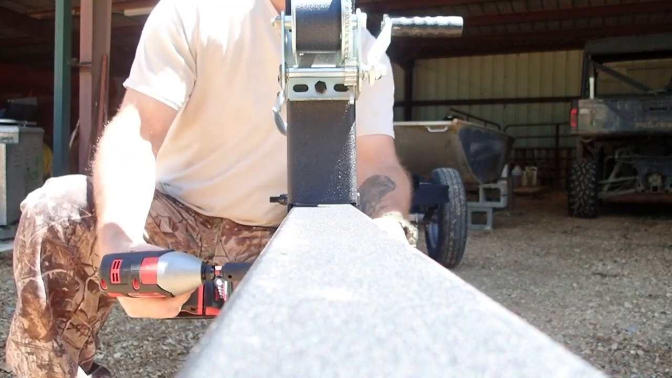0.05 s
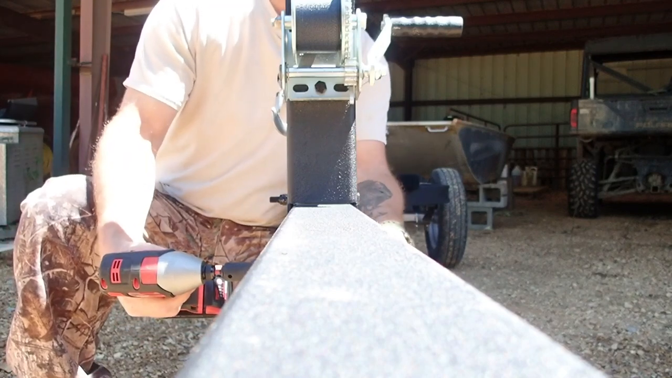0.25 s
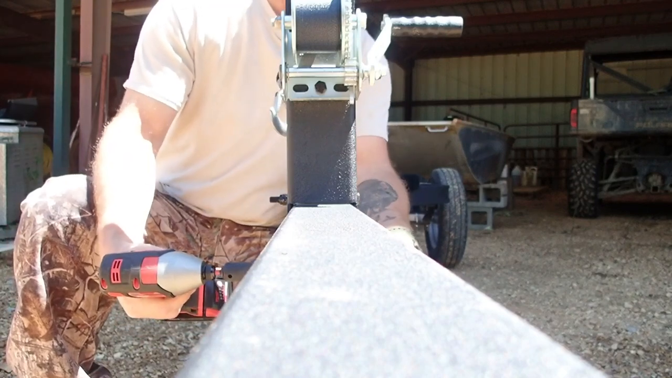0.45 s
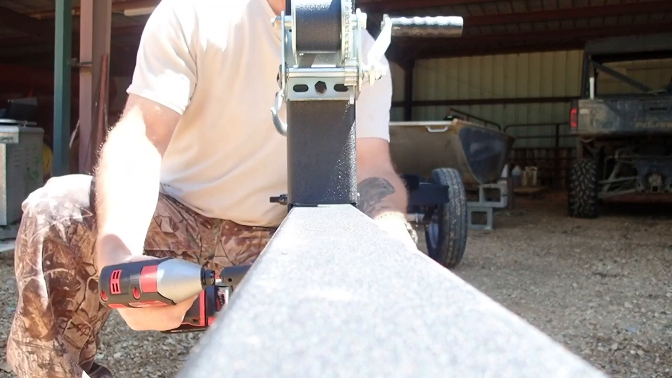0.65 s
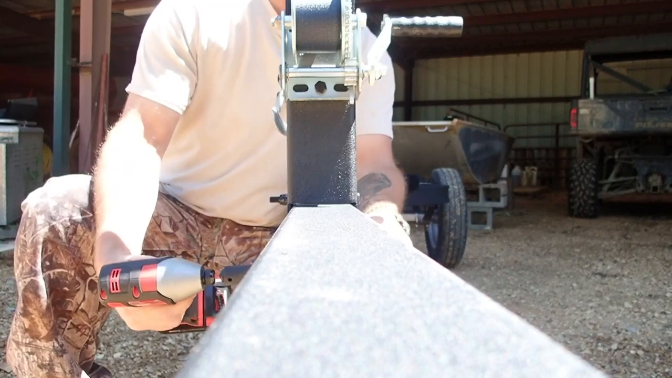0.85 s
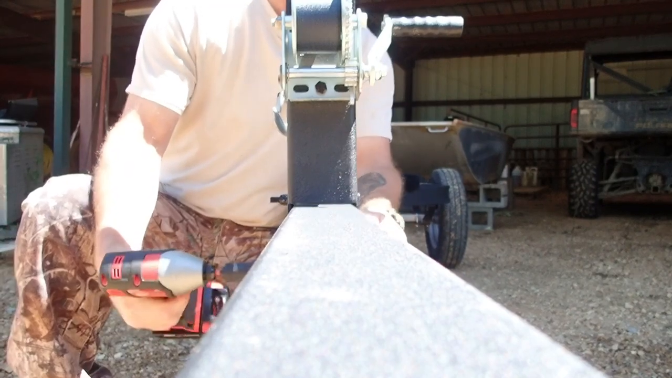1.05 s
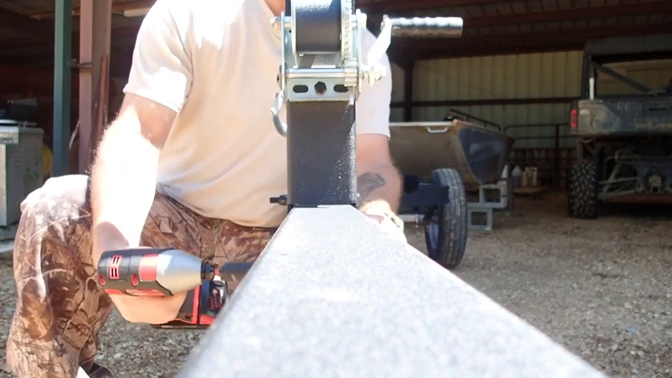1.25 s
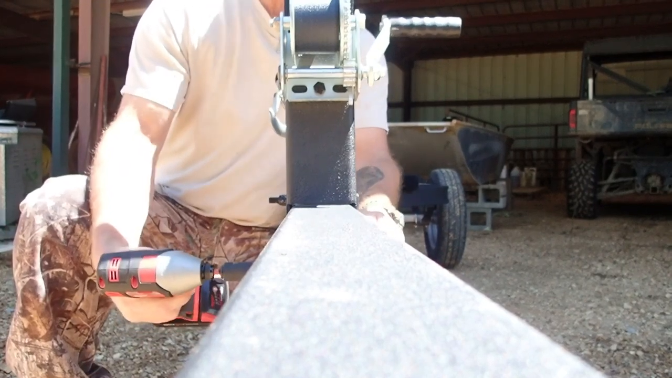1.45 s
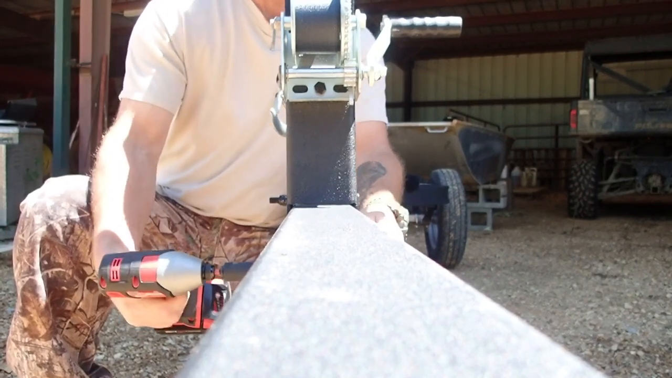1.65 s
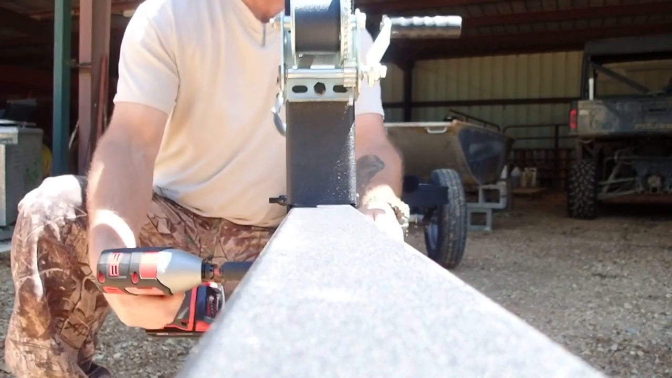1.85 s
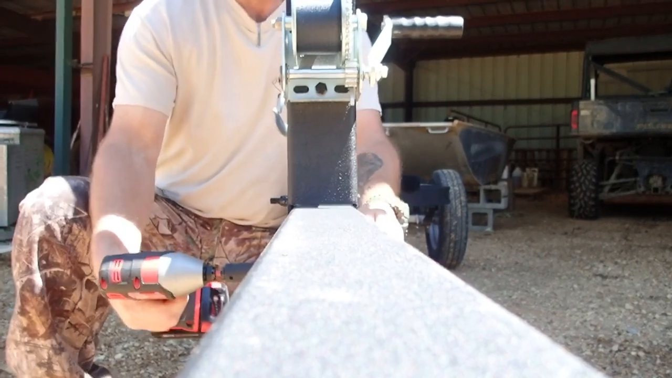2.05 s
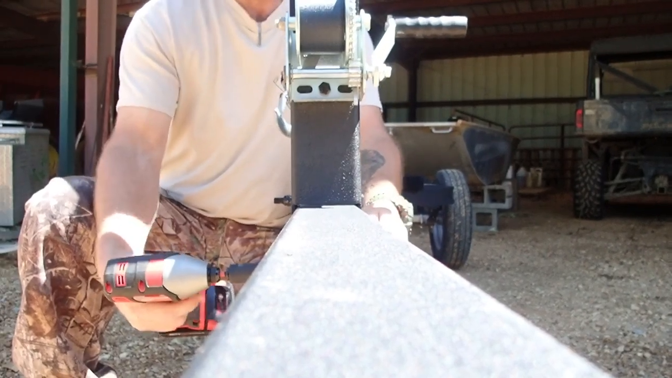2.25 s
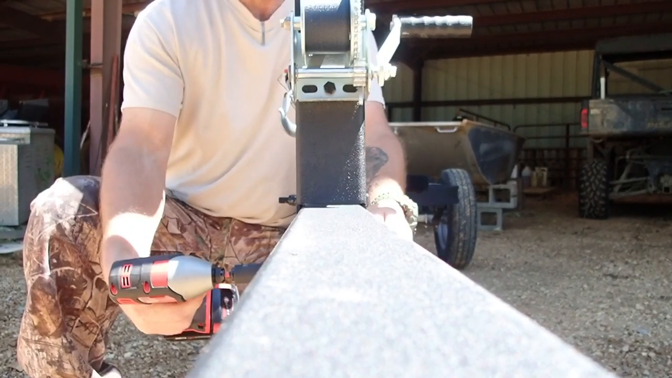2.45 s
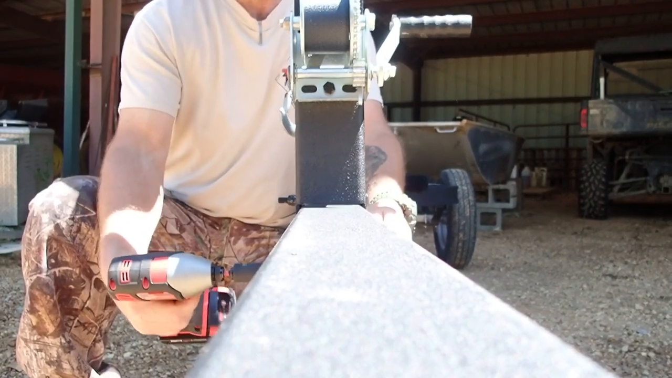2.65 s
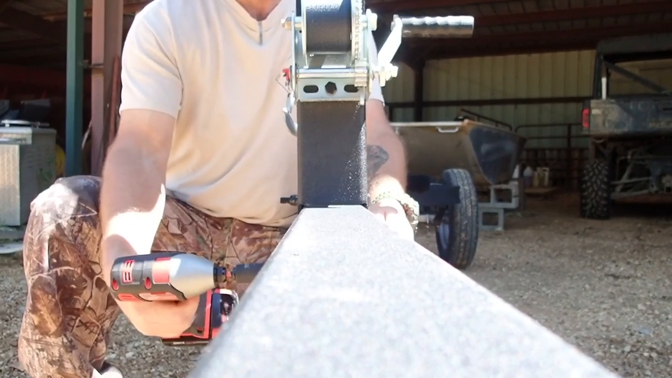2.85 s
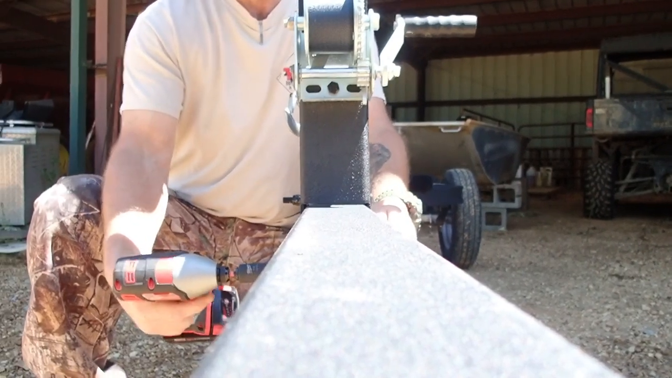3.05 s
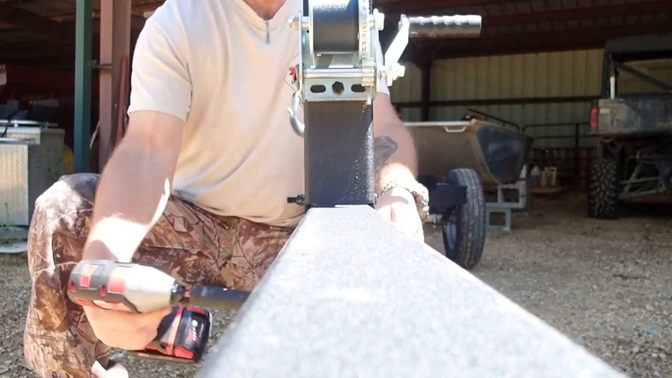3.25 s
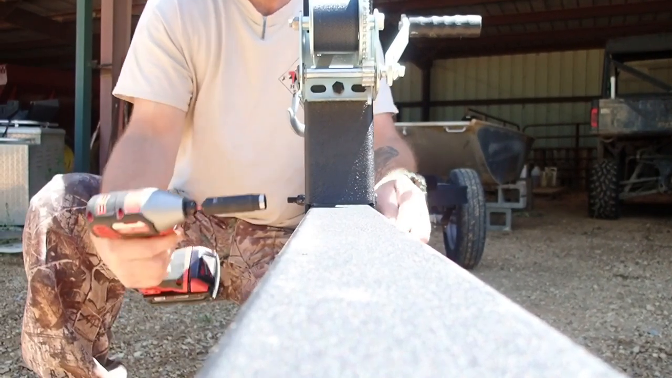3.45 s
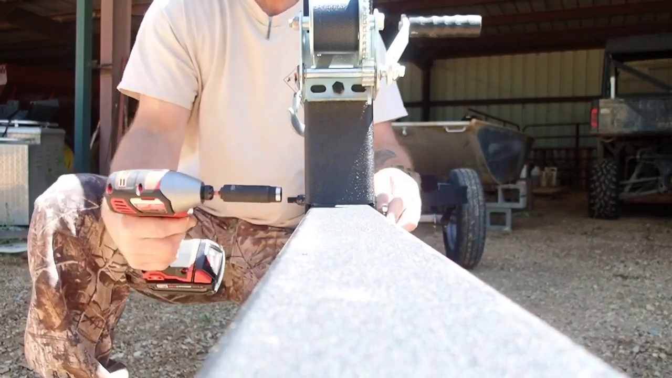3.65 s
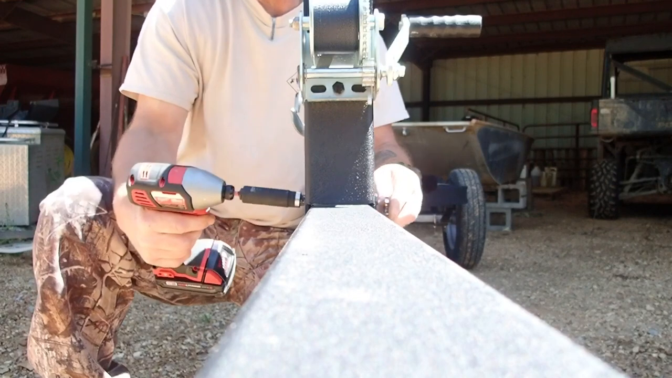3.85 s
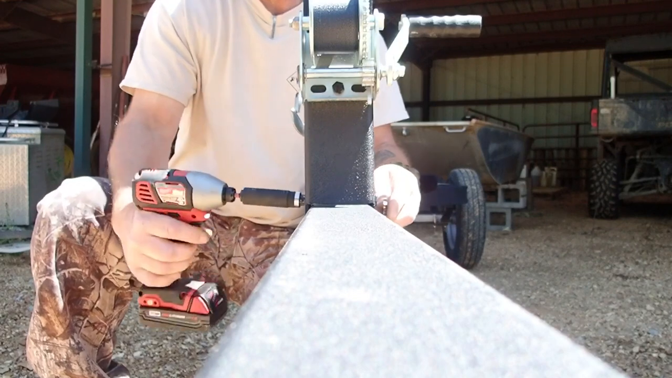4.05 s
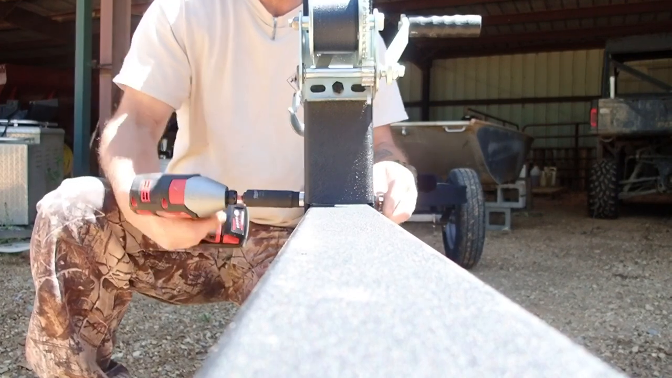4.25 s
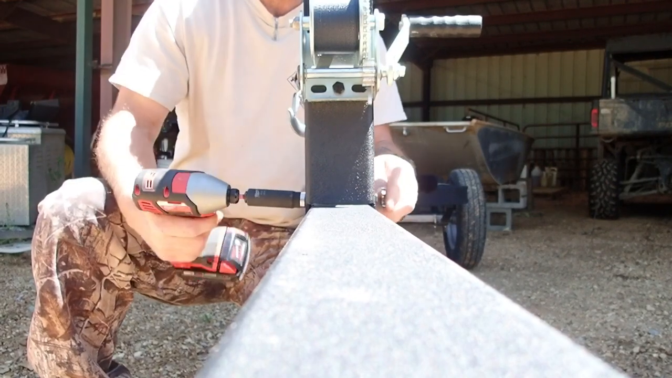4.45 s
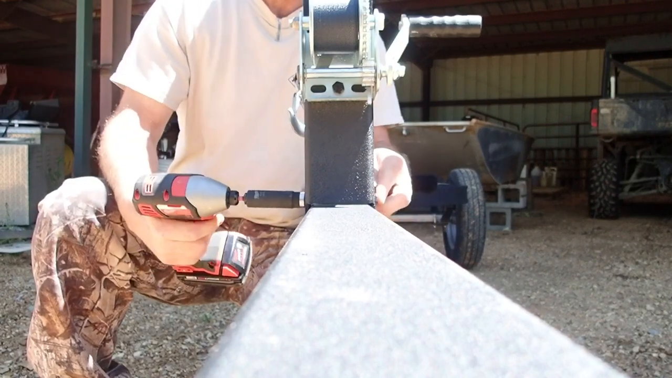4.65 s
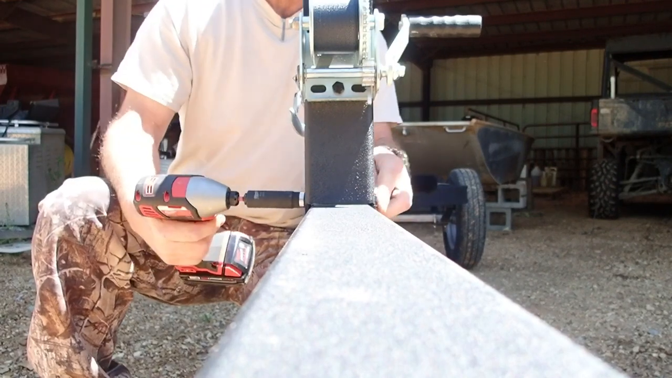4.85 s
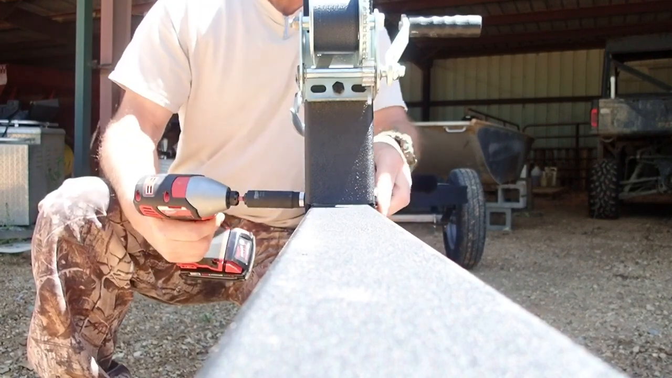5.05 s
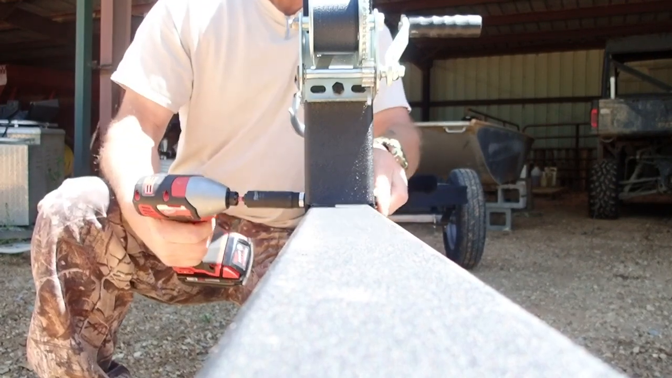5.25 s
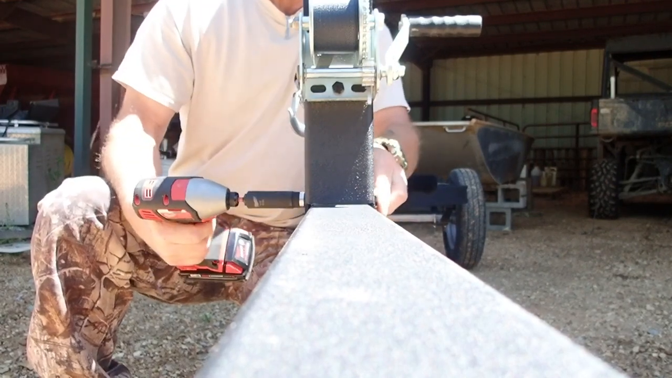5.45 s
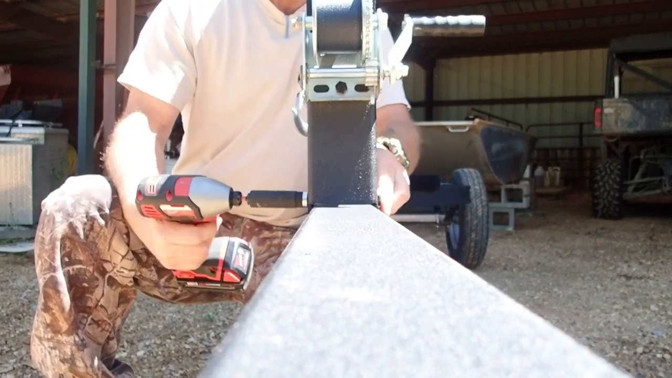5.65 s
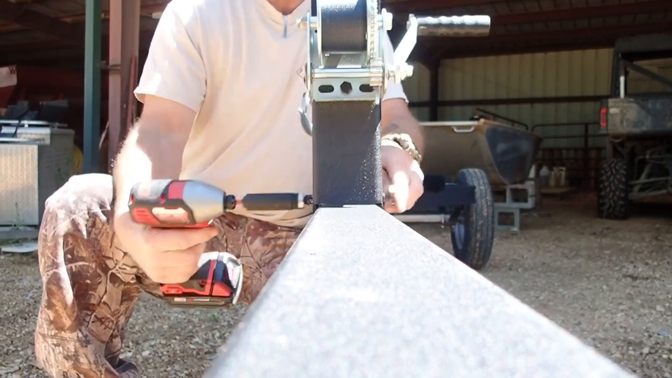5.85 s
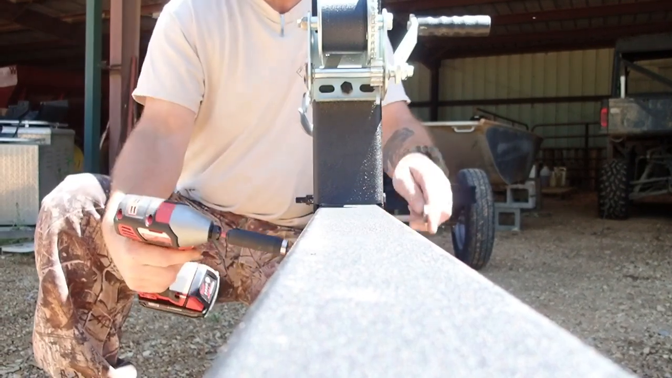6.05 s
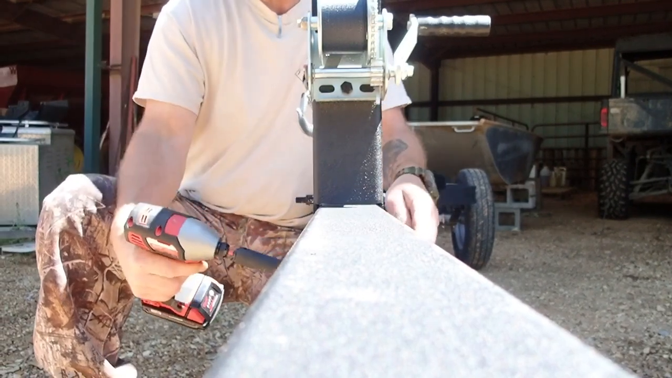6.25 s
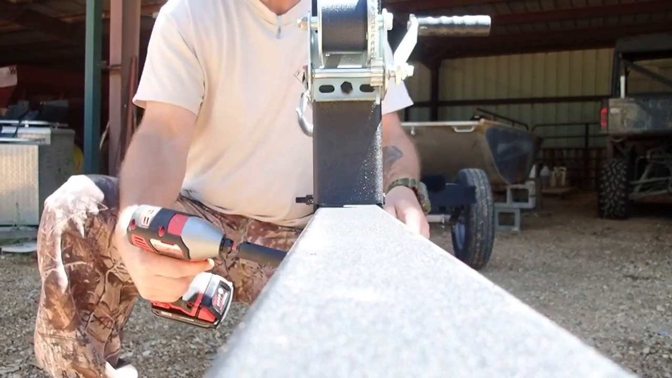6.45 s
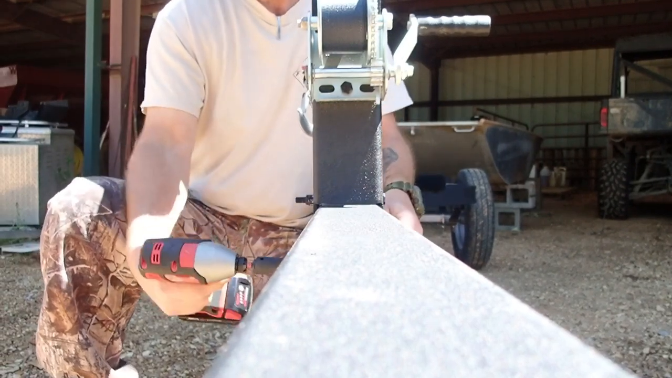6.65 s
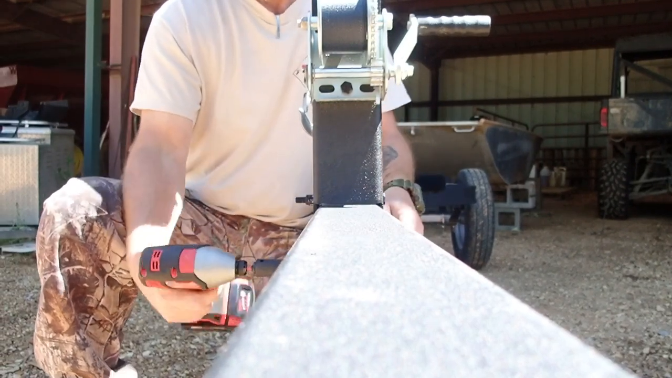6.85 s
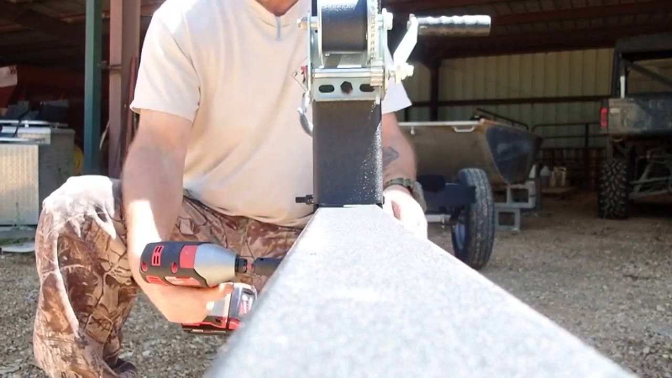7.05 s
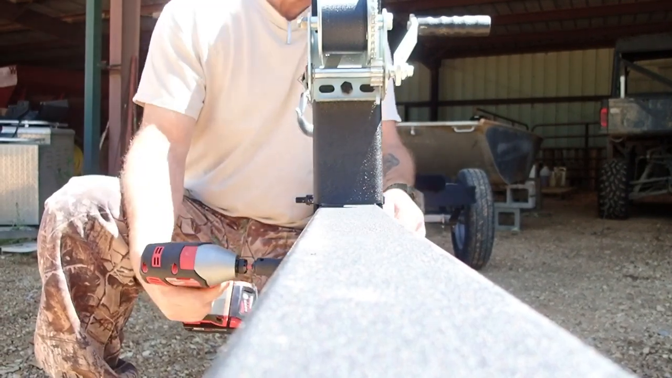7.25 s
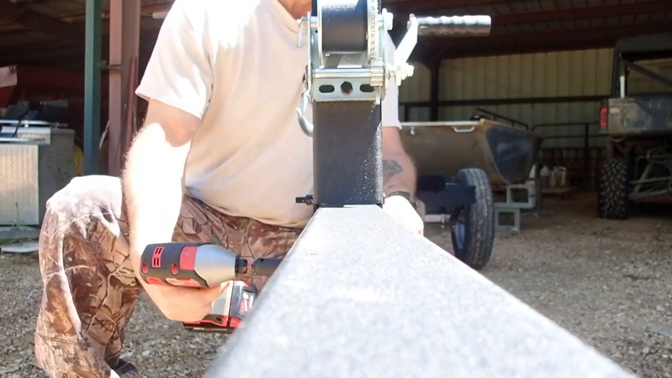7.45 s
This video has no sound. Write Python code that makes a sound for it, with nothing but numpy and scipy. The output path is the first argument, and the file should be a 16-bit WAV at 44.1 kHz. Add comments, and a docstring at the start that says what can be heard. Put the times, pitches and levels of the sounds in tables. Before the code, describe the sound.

A cordless impact driver hammers in short rapid bursts on a steel winch stand, with metallic socket knocks between, echoing softly in an open shed.

```python
"""First comes a faint rumble with hiss, then soft knocks of socket and spanner on a steel winch stand.
At the mouth of a shed, a cordless impact driver then tightens two bolts, with more knocks in between.
Blows, knocks and gear rattle are short bursts of noise, coloured by filters and by ringing steel.
A thin whine, a sine tone, leads each pull of the trigger. Fading noise makes the shed's low echo."""
import sys
import numpy as np
from scipy import signal
from scipy.fft import rfft, irfft, next_fast_len
from scipy.io import wavfile
from scipy.ndimage import uniform_filter1d

SR = 44100
rng = np.random.default_rng(int(sys.argv[2]) if len(sys.argv) > 2 else 0)


def log_audio(samples):
    """Write samples as a 16-bit WAV file to the path given in sys.argv[1]."""
    # one column per channel
    frames = np.atleast_2d(samples).T
    # limit to full scale, then quantise
    limited = np.clip(frames, -1, 1)
    pcm = np.round(limited * 32767).astype(np.int16)
    wavfile.write(sys.argv[1], SR, pcm)


N = 330731
TIME = np.arange(N) / SR

# the background's tone: [f/Hz, relative level/dB per Hz]
AIR_COLOUR = [(25, -33), (60, 3), (100, -11.5), (145, 3.5), (200, -35), (300, -6), (430, -16.5), (700, -17),
              (1000, -13.5), (1800, -22.5), (3000, -38.5), (4200, -30), (6500, -15.5), (7600, -20),
              (9200, -11), (10500, -25.5), (15500, -25.5)]
AIR_DB = -52.5  # rms, before the microphone

# socket or spanner knocks on the stand:
# [t/s, tube clang level/dB, socket clink level/dB, length/ms, strongest ring f/Hz]
KNOCKS = [(0.125, -40.5, -61, 17, 317), (0.668, -37.5, -64, 18.5, 322), (0.797, -20, -14.5, 8.2, 938),
          (1.063, -32, -31.5, 48, 970), (1.237, -25.5, -31, 32, 203), (1.422, -16, -12, 1.9, 1230),
          (3.277, -28.5, -25.5, 11, 1226), (3.809, -13.5, -15, 15.4, 1103), (3.874, -16.5, -12.5, 22, 1700),
          (3.893, -19.5, -25, 20.5, 1617), (3.922, -16.5, -9.5, 8.4, 943), (4.220, -36, -34, 17, 996),
          (4.268, -38, -41, 31, 967), (4.337, -29.5, -26.5, 5, 1700), (4.341, -16.5, -13.5, 21.7, 1763),
          (4.349, -14.5, -34, 18.4, 1697), (4.692, -26.5, -34, 2.3, 905), (4.971, -32.5, -29.5, 7.3, 984),
          (5.018, -21.5, -10, 5.1, 2040), (5.266, -28.5, -15.5, 16, 1060), (5.325, -24, -10, 1.1, 1110),
          (5.976, -21, -15.5, 13, 1660), (6.448, -24, -33, 28.5, 900), (6.592, -32.5, -29.5, 25, 960),
          (6.615, -20.5, -10.5, 11, 988), (6.627, -12.5, -6, 3.9, 932), (6.660, -17.5, -13.5, 12, 1330),
          (6.686, -22.5, -17, 28, 1600), (6.715, -26.5, -10, 7, 1550), (6.768, -17.5, -18.5, 25.3, 1500),
          (6.842, -31.5, -28.5, 14, 1640), (6.915, -35.5, -36, 18, 993), (7.080, -33, -55.5, 1.3, 1603)]
# hands shift on the steel with soft random taps:
# [start t/s, end t/s, clang level/dB, clink level/dB, strongest ring f/Hz]
FUMBLES = [(.35, .46, -51, -72, 315), (4.479, 4.54, -36.5, -33.5, 1387), (4.828, 4.95, -40.5, -52, 968),
           (6.97, 7.08, -47.5, -43, 311)]
TAPS_PER_S, TAP_SPREAD_DB, TAP_MS = 40, 3.5, 12.8
# the frame thuds more for a harder and a longer push
THUD_DB, THUD_SHARE, THUD_MS, THUD_SLOPE = -17.5, 0.77, 13.8, 1
# after a knock the frame rocks back with a softer, longer thud
SWAY_S, SWAY_DB, SWAY_MS = 0.045, -4.5, 27
KNOCK_RING_DB, KNOCK_RING_T60_S = -3.5, 0.049

# tone of a clanging tube: [f/Hz, relative level/dB per Hz]
CLANG_COLOUR = [(100, -62), (450, -29), (560, -15.5), (660, -12), (900, 2), (1200, -1.5), (1650, -1.5),
                (2050, -3), (2600, -18), (4000, -19), (9000, -37)]
# tone of a clinking socket: [f/Hz, relative level/dB per Hz]
CLINK_COLOUR = [(800, -14), (2500, -19), (3400, -11.5), (4800, 7.5), (6000, 4.5), (7000, 4), (7800, -7.5),
                (9000, -7), (10500, -24), (15500, -34.5)]
# tone of a thudding frame: [f/Hz, relative level/dB per Hz]
THUD_COLOUR = [(25, -11.5), (80, -24), (130, -2.5), (200, 2), (310, 1.5), (450, -5), (570, -4.5),
               (700, -11), (1500, -35), (5000, -63)]
# ringing modes of the steel tube: [f/Hz, relative level/dB, time to fade by 60 dB t/s]
TUBE_MODES = [(882, -2.5, 0.51), (964, 5.5, 0.13), (1107.3, -2, 0.26), (1290, -5, 0.69), (1361, 3.5, 0.75),
              (1503, -12, 0.09), (1652, 4, 0.12), (1706, -10.5, 0.31), (1705, -6.5, 0.24),
              (1968, -4.5, 0.13), (2134, -13, .08)]
# ringing modes of socket and anvil: [f/Hz, relative level/dB, time to fade by 60 dB t/s]
SOCKET_MODES = [(5100, -14.5, .05), (5630, -16.5, 0.084), (6118, -21, 0.093), (6447, 8, 0.22),
                (7100, -15.5, 0.14), (6880, 0.5, 0.045), (6430, 4, .05), (7130, -0.5, 0.037)]

# echo strength of nearby surfaces: [f/Hz, level/dB]
NEAR_LEVEL = [(150, -6.5), (1200, -2), (3000, -2.5), (6000, -7.5), (14000, -1.5)]
# echo length of nearby surfaces: [f/Hz, time to fade by 60 dB t/s]
NEAR_T60 = [(150, 0.15), (1200, 0.19), (6000, 0.18), (14000, 0.03)]
# echo strength of the hall behind: [f/Hz, level/dB]
HALL_LEVEL = [(60, -14), (190, -2), (550, -10), (1400, -16), (3000, -15), (6000, -26), (14000, -22)]
# echo length of the hall behind: [f/Hz, time to fade by 60 dB t/s]
HALL_T60 = [(150, 0.98), (500, 0.68), (1400, 0.75), (6000, 0.74), (14000, 0.27)]

# steel that rings freely until a hand or the next contact damps it:
# [start t/s, damped t/s, f/Hz, relative level/dB, time to fade by 60 dB t/s]
LONG_RINGS = [(1.003, 1.31, 1247, -11.5, 4.1), (1.428, 3.49, 1257, -21.5, 14),
              (2.767, 2.935, 1284, -9, 3.8), (3.797, 4.01, 1100, -10.5, 0.43),
              (4.313, 4.616, 1335, -15, 1.1), (5.548, 6.166, 1101, -18.5, 4.1),
              (6.441, 6.905, 887, -16.5, 0.65)]

# pulls of the trigger: [bite t/s, wait for the first blow t/s, count of blows, first blow rate f/Hz,
# later blow rate f/Hz, blow level/dB, change of level by the last blow/dB, blow length/ms,
# rattle level/dB, whine level/dB, bite clang level/dB, frame jolt level/dB]
BURSTS = [(1.095, 0.029, 4, 41.4, 40.5, 4.5, -1, 0.64, -29, -46, -9.5, -14),
          (1.389, 0.042, 5, 40.3, 47, -1.5, -0.5, 1.85, -36.5, -55, -14.5, -14),
          (1.739, .015, 37, 40.3, 64.9, -10.5, -2, 5.4, -20, -48, -13.5, -24),
          (2.686, 0.017, 8, 47.4, 70.5, -9, -4, 4.7, -17.5, -45.5, -16.5, -47),
          (2.955, .005, 13, 60, 66, -8.5, -1, 2.6, -18, -54, -36.5, -41.5),
          (5.316, .035, 7, 49, 66.7, -8.5, 5.5, 3.03, -21.5, -40, -9, -25),
          (5.635, .026, 9, 48, 61.3, -7.5, -0.5, 5.1, -25, -50.5, -26.5, -31)]
RATE_SETTLING_S = 0.06  # time constant from the first blow rate to the later one
WHINE_LEAD_S, WHINE_S = 0.056, 0.04  # start before the bite, and length
# the rattle swells before the slack is taken up and drops after the last blow
RUN_UP_DB_PER_S, BRAKE_DB_PER_S = 858, 203
COAST_DB, COAST_DB_PER_S = -13, 46  # then the gears run out quietly
# each burst opens alike: the socket takes up its slack, then bites on the bolt head
SLACK_S, SLACK_MS = 0.011, 9
SLACK_CLANG_DB, SLACK_CLINK_DB, SLACK_THUD_DB = -17.5, -17.5, -24
BITE_CLINK_DB, BITE_THUD_DB, BITE_MS = 1, -23, 2.7
# a tight bolt passes each blow on to the frame; the first two are relative to the jolt's thud
JOLT_CLANG_DB, JOLT_CLINK_DB, JOLT_MS = 4, 4.5, 3.74
LOOSEN_DB_PER_S = 152  # the jolts die away as the bolt gives
# tone of the tool under its blows and rattle: [f/Hz, relative level/dB per Hz]
HAMMER_COLOUR = [(60, -62.5), (180, -23.5), (560, -30.5), (680, -14), (900, -11), (1300, -4.5),
                 (2000, -4.5), (2700, -18.5), (3500, -15), (4700, 1.5), (6900, 5), (7700, -4), (8800, -1),
                 (10500, -18), (13000, -22), (15500, -38)]

# likeness of the sound at the two microphone ports: [f/Hz, likeness from 0 to 1]
LIKENESS = [(100, 0.3), (300, .5), (700, 0.77), (2200, 1), (3600, 0.93), (5200, 0.65), (8000, 0.5),
            (14000, 0)]
# balance of the two ports: [f/Hz, left minus right level/dB]
LEFT_BALANCE = [(40, -1), (150, 8.5), (300, 1), (700, 1.5), (2500, 1.2), (5000, -1), (12000, -0.5)]
EDGE_HZ = 15750  # upper limit of the microphone's band


def amp(db):
    """Turns decibels into a gain."""
    return 10 ** (np.asarray(db) / 20)


def evened(x):
    """Scales a sound to rms 1."""
    return x / np.sqrt(np.mean(x ** 2) + 1e-20)


def read(points, hz):
    """Reads between the points of a table, on a log-frequency axis."""
    f, value = np.transpose(points)
    return np.interp(np.log(hz + 1), np.log(f + 1), value)


def add(mix, s, sound):
    """Mixes a sound in at a time in seconds."""
    part = mix[..., max(round(s * SR), 0):][..., :sound.shape[-1]]
    part += sound[..., :part.shape[-1]]


def convolve(x, response):
    """Lets every sample set off the response, and cuts the result to the length of the scene."""
    return signal.oaconvolve(np.atleast_2d(x), np.atleast_2d(response), axes=1)[:, :N]


def colour(x, points, size=4096):
    """Gives a sound the tone of a table, by a filter of unit energy that only looks back in time."""
    log_gain = np.log(amp(read(points, abs(np.fft.fftfreq(size, 1 / SR)))))
    # the Hilbert transform supplies the phase that puts the energy as early as possible
    spectrum = np.exp(np.conj(signal.hilbert(log_gain)))
    taps = np.fft.ifft(spectrum).real[:size // 2]
    return convolve(x, taps / np.linalg.norm(taps))


def modes(x, table):
    """Rings a set of fading tones; each level sets the share of energy in that tone."""
    t = TIME[:SR // 2]
    ring = np.zeros(len(t))
    for hz, db, t60 in table:
        tone = amp(-60 * t / t60) * np.sin(2 * np.pi * hz * t)
        ring += amp(db) * evened(tone)
    return convolve(x, ring / np.linalg.norm(ring))


def ports(pair):
    """Makes two unrelated signals as alike as the microphone ports hear them."""
    size = next_fast_len(pair.shape[1])
    a, b = rfft(pair, size)
    same = np.clip(read(LIKENESS, np.fft.rfftfreq(size, 1 / SR)), -1, 1)
    second = same * a + np.sqrt(1 - same ** 2) * b
    return irfft(np.array([a, second]), size)[:, :pair.shape[1]]


def air():
    """Faint outdoor rumble and microphone hiss: noise coloured by a table."""
    noise = ports(rng.standard_normal((2, N)))
    return amp(AIR_DB) * evened(colour(noise, AIR_COLOUR))


def contact(ms, squareness=1):
    """One metal contact: a sharp start and a dense chatter that dies within milliseconds."""
    t = TIME[:SR // 5]
    shape = np.exp(-(t * 1000 / max(ms, 0.3)) ** squareness)
    chatter = shape * rng.standard_normal((2, len(t)))
    # both sides get the energy of the shape, whatever the draw
    return chatter * np.linalg.norm(shape) / np.linalg.norm(chatter, axis=1, keepdims=True)


def touches():
    """The knocks, and the soft taps of fumbling hands: (t/s, clang/dB, clink/dB, length/ms, ring f/Hz)."""
    rows = list(KNOCKS)
    for start, end, clang_db, clink_db, hz in FUMBLES:
        chance = rng.standard_normal((20, 2))
        for s, (late, strong) in zip(np.arange(start, end, 1 / TAPS_PER_S), chance):
            tap_s = s + 0.43 * late / TAPS_PER_S
            db = TAP_SPREAD_DB * strong
            rows.append((tap_s, clang_db + db, clink_db + db, TAP_MS, hz))
    return rows


def contacts(strikes, touched):
    """All that hits the stand, by hand, bite or hammer: (t/s, clang/dB, clink/dB, thud/dB, length/ms)."""
    rows = []
    for s, clang_db, clink_db, ms, _ in touched:
        thud_db = THUD_DB + THUD_SHARE * clang_db + THUD_SLOPE * 20 * np.log10(ms / THUD_MS)
        rows.append((s, clang_db, clink_db, thud_db, ms))
        rows.append((s + SWAY_S, -np.inf, -np.inf, thud_db + SWAY_DB, SWAY_MS))
    for bite, *_, clang_db, _ in BURSTS:
        rows.append((bite - SLACK_S, SLACK_CLANG_DB, SLACK_CLINK_DB, SLACK_THUD_DB, SLACK_MS))
        rows.append((bite, clang_db, BITE_CLINK_DB, BITE_THUD_DB, BITE_MS))
    for s, _, _, jolt_db in strikes:
        rows.append((s, jolt_db + JOLT_CLANG_DB, jolt_db + JOLT_CLINK_DB, jolt_db, JOLT_MS))
    return rows


def knocks(hits, clang_db=0.5, tube_db=-7.0, clink_db=-1, socket_db=-13, thud_db=0,
           bright_hz=13000, softening=0.58):
    """Each hit clangs the tube, clinks the socket and thuds through the frame."""
    clang, clink, thud = np.zeros((3, 2, N))
    for s, clang_level, clink_level, thud_level, ms in hits:
        # a gentle touch sounds duller
        top_hz = np.clip(bright_hz * amp(softening * clang_level), 500, SR / 3)
        low_pass = signal.butter(2, top_hz, fs=SR, output="sos")
        add(clang, s, amp(clang_level) * signal.sosfilt(low_pass, contact(ms)))
        add(clink, s, amp(clink_level) * contact(ms))
        add(thud, s, amp(thud_level) * contact(ms))
    clang, clink, thud = ports(clang), ports(clink), ports(thud)
    tube = amp(clang_db) * colour(clang, CLANG_COLOUR) + amp(tube_db) * modes(clang, TUBE_MODES)
    socket = amp(clink_db) * colour(clink, CLINK_COLOUR) + amp(socket_db) * modes(clink, SOCKET_MODES)
    return tube + socket + amp(thud_db) * colour(thud, THUD_COLOUR)


def struck_spot(touched):
    """Each spot of the stand favours one short ring, which a longer touch starts more slowly."""
    out, t = np.zeros(N), TIME[:SR // 3]
    for s, clang_db, _, ms, hz in touched:
        rise = 1 - np.exp(-2000 * t / ms)
        ring = amp(-60 * t / KNOCK_RING_T60_S) * rise * np.sin(2 * np.pi * hz * t)
        push = np.sqrt(ms * SR / 2000)  # a longer touch gives more energy
        add(out, s, amp(clang_db + KNOCK_RING_DB) * push * ring / np.linalg.norm(ring))
    return out


def echo(x, level_db, t60, delay_s, rise_s):
    """A diffuse tail of noise that builds up, then dies at its own speed in each band."""
    noise = ports(rng.standard_normal((2, SR * 3 // 2)))
    hz, t, z = signal.stft(noise, SR, nperseg=512)
    shape = amp(-60 * t / read(t60, hz)[:, None])
    shape *= 1 - np.exp(-(t + 1 / SR) / rise_s)
    # even out the energy of each band, then set its level
    shape *= amp(read(level_db, hz))[:, None] / np.sqrt((shape ** 2).sum(1, keepdims=True) * t[1] * SR)
    tail = signal.istft(z * shape, SR, nperseg=512)[1]
    return convolve(x, np.pad(tail, ((0, 0), (round(delay_s * SR), 0))))


def long_rings(shaking, waver=0.42, damped_t60=0.85):
    """Lightly damped steel stores the shaking's energy, then frees it slowly, wavering in the grip."""
    out = np.zeros(N)
    for start, end, hz, db, t60 in LONG_RINGS:
        # follow each ring for 0.7 s after it is damped
        power = shaking[0, round(start * SR):round((end + 0.7) * SR)] ** 2
        t = start + TIME[:len(power)]
        keep = np.exp(-np.log(1e6) / (t60 * SR))  # share of energy left after one sample
        stored = signal.lfilter([1 - keep], [1, -keep], power * (t < end))
        # random changes of strength and phase, with a new target every 35 ms
        knots = np.arange(0, TIME[-1], 0.035)
        targets = rng.standard_normal((len(knots), 2)) @ [1, 1j]
        wander = 1 + waver * np.interp(t, knots, targets)
        tone = (wander * np.exp(2j * np.pi * hz * t)).real
        damping_db = 60 * np.maximum(t - end, 0) / damped_t60
        add(out, start, amp(db - damping_db) * np.sqrt(2 * stored) * tone)
    return out


def whine(hz=7800):
    """The chopped motor current sings one steady tone just before each bite."""
    gate = np.zeros(N)
    for bite, *_, db, _, _ in BURSTS:
        middle = bite - WHINE_LEAD_S + WHINE_S / 2
        gate += amp(db) * (abs(TIME - middle) < WHINE_S / 2)
    return uniform_filter1d(gate, size=300) * np.sin(2 * np.pi * hz * TIME)


def blow_times(wait, count, first_rate, later_rate):
    """Seconds from the bite to each blow, as the hammer settles from its first rate to its later one."""
    times = [wait]
    while len(times) < round(count):
        settling = np.exp((wait - times[-1]) / RATE_SETTLING_S)
        rate = later_rate + (first_rate - later_rate) * settling
        times.append(times[-1] + 1 / rate)
    return np.array(times)


def spin(fade_share=1.54):
    """Gain of the spinning gears: each pull runs up, holds, brakes and coasts."""
    level = np.zeros(N)
    for bite, wait, count, first_rate, later_rate, _, fade_db, _, rattle_db, *_ in BURSTS:
        t = TIME - bite
        length = blow_times(wait, count, first_rate, later_rate)[-1]
        before, after = np.maximum(-SLACK_S - t, 0), np.maximum(t - length, 0)
        held_db = rattle_db + fade_share * fade_db * np.clip(t / length, 0, 1) ** 2
        stop_db = np.maximum(-BRAKE_DB_PER_S * after, COAST_DB - COAST_DB_PER_S * after)
        level += amp(np.maximum(held_db - RUN_UP_DB_PER_S * before + stop_db, -200))
    return level


def rattle(hiss=0.45, ticks_per_s=1100, tick_s=0.0005):
    """Gear teeth and the loose socket tick at random while the motor spins, over a steadier hiss."""
    ticks = (rng.random(N) < ticks_per_s / SR) * rng.uniform(0.4, 1, N)
    grain = evened(signal.lfilter([1], [1, -np.exp(-1 / (tick_s * SR))], ticks))
    return spin() * evened(hiss + grain) * rng.standard_normal((2, N))


def blows(jitter_s=0.0003, uneven_db=1.5):
    """Uneven blows of a spring-loaded hammer, drifting in level: (t/s, level/dB, length/ms, jolt/dB)."""
    rows = []
    for bite, wait, count, first_rate, later_rate, db, fade_db, ms, *_, jolt_db in BURSTS:
        times = blow_times(wait, count, first_rate, later_rate)
        for t, (late, strong) in zip(times, rng.standard_normal((50, 2))):
            change_db = fade_db * (t / times[-1]) ** 2 + uneven_db * strong
            blow_jolt_db = jolt_db + change_db - LOOSEN_DB_PER_S * (t - wait)
            rows.append((bite + t + jitter_s * late, db + change_db, ms, blow_jolt_db))
    return rows


def hammer(strikes, rebound_s=0.0037, rebound_jitter_s=0.0005, rebound_db=-8, rebound_spread_db=3):
    """The hammer strikes the anvil, then rebounds once for a second, shorter contact."""
    force = np.zeros((2, N))
    for s, db, ms, _ in strikes:
        late, bouncy = rng.standard_normal(2)
        add(force, s, amp(db) * contact(ms, squareness=2.5))
        second_s = s + rebound_s + rebound_jitter_s * late
        second_db = db + rebound_db + rebound_spread_db * bouncy
        add(force, second_s, amp(second_db) * contact(ms / 2))
    return force


def driver(force, body_db=0, socket_db=-10, tube_db=-16):
    """Blows and rattle sound through the tool, ring the socket and reach the tube through the bolt."""
    body = amp(body_db) * colour(force, HAMMER_COLOUR)
    socket = amp(socket_db) * modes(force, SOCKET_MODES)
    tube = amp(tube_db) * modes(force, TUBE_MODES)
    return body + socket + tube


def scene():
    """Tool and steel, their reflections from nearby surfaces and from the shed, and the air."""
    background, touched, strikes = air(), touches(), blows()
    stand = knocks(contacts(strikes, touched)) + struck_spot(touched)
    tool = driver(ports(hammer(strikes) + rattle()))
    direct = stand + tool
    near = echo(direct, NEAR_LEVEL, NEAR_T60, delay_s=0.0033, rise_s=0.00052)
    hall = echo(direct, HALL_LEVEL, HALL_T60, delay_s=0.03, rise_s=0.059)
    return direct + near + hall + long_rings(direct) + whine() + background


def record(dry, low_cut_hz=90, ceiling=1):
    """The microphone balances its two ports, thins the bass, rounds off loud peaks and limits the band."""
    size = next_fast_len(N)
    half_balance_db = read(LEFT_BALANCE, np.fft.rfftfreq(size, 1 / SR)) / 2
    heard = irfft(rfft(dry, size) * amp([half_balance_db, -half_balance_db]), size)[:, :N]
    heard = signal.sosfilt(signal.butter(2, low_cut_hz, "high", fs=SR, output="sos"), heard)
    rounded = heard / (1 + (heard / ceiling) ** 4) ** 0.25
    band_limit = signal.firwin(511, EDGE_HZ, window=("kaiser", 9), fs=SR)
    return signal.oaconvolve(rounded, band_limit[None], "same")


dry = scene()
out = record(dry)
log_audio(out)
```